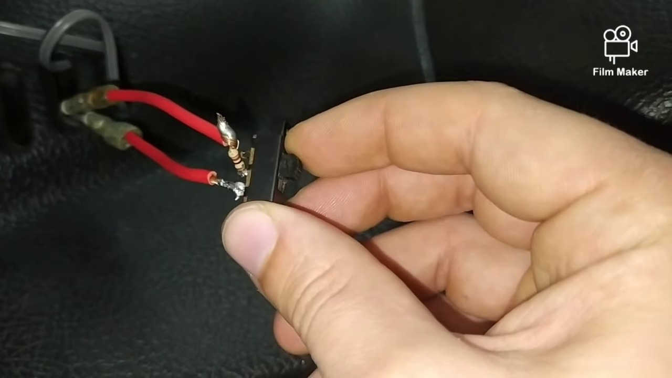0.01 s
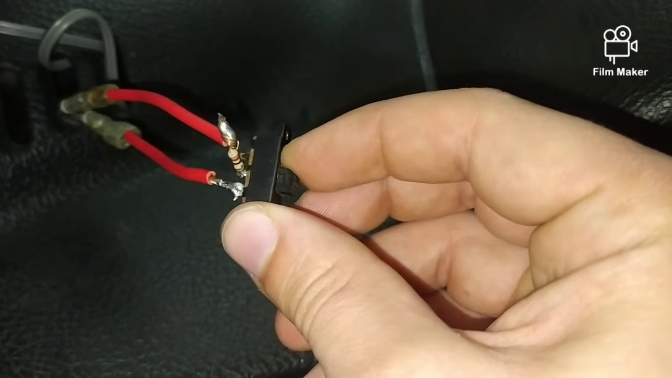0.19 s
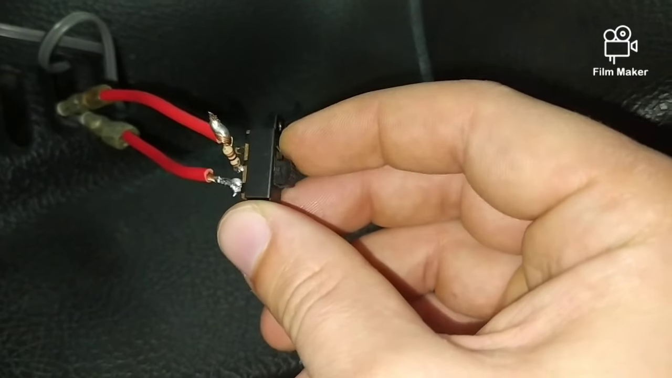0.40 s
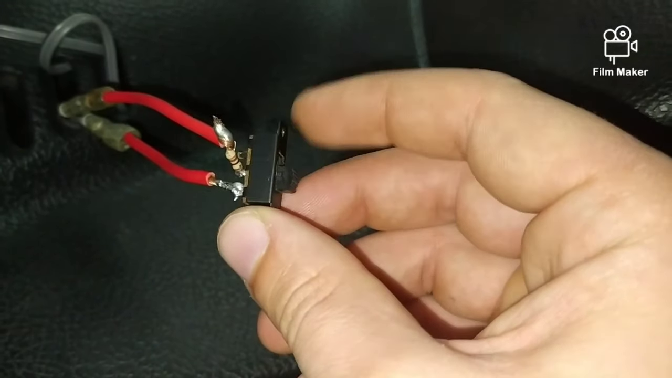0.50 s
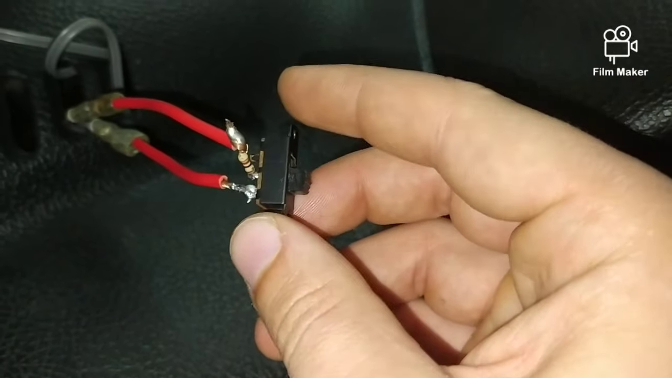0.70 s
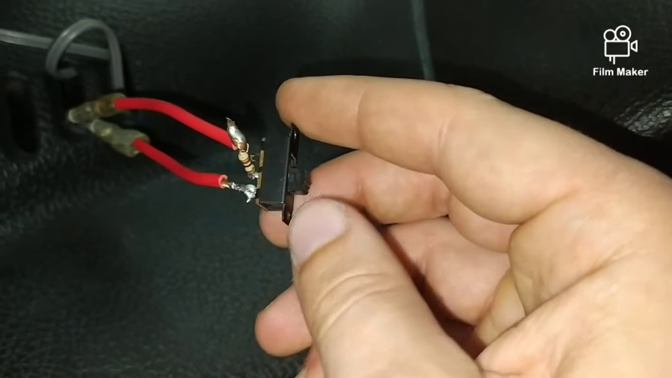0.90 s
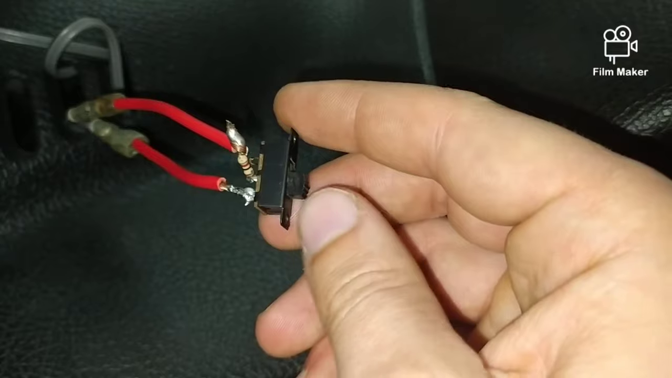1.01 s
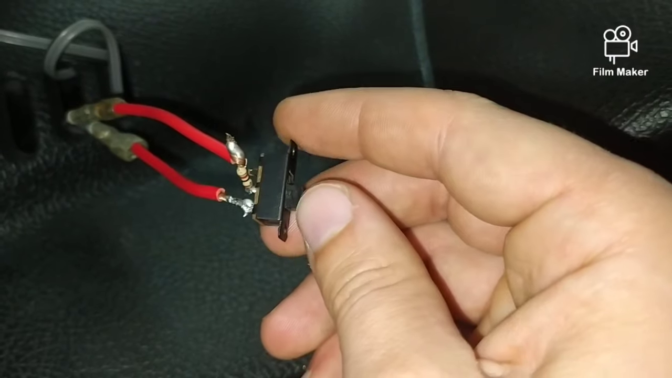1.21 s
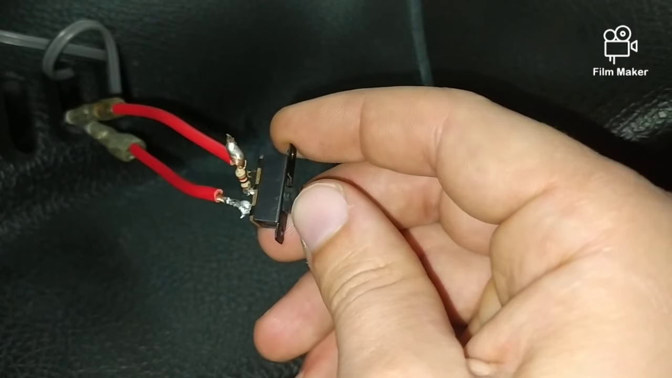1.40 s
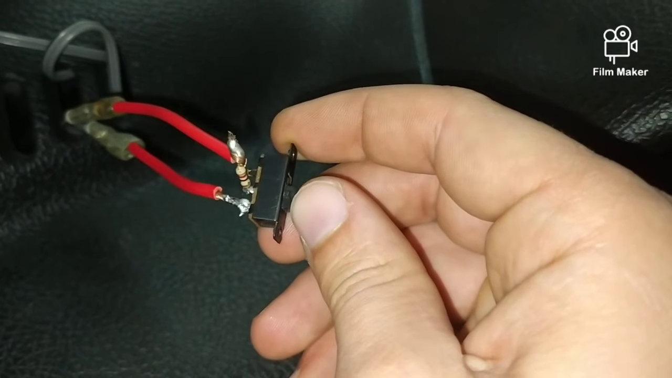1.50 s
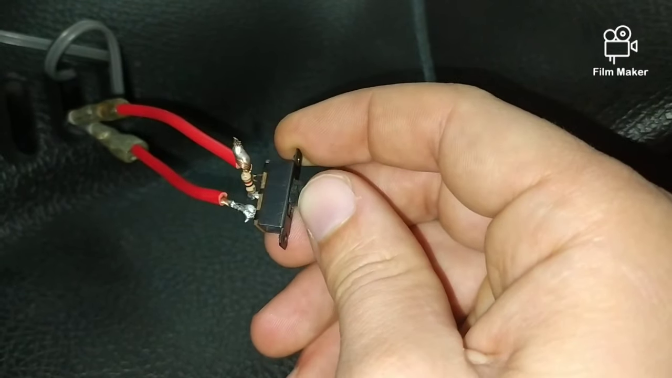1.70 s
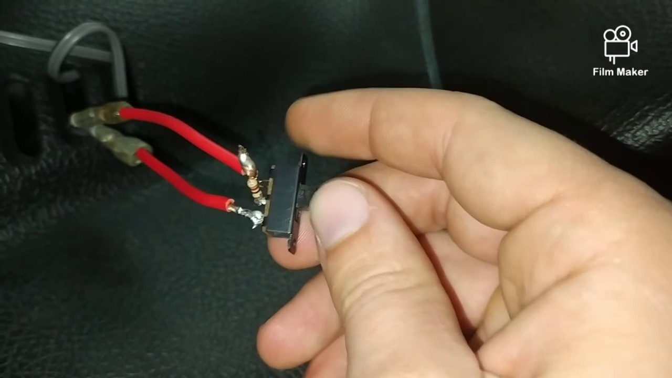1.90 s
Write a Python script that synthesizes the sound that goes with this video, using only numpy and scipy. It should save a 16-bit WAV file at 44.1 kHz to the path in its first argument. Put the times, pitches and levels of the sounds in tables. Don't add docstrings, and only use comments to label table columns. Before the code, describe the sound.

Close, dry clicks of a hand-operated slide switch: first a rattling cluster of contacts, then much later a tighter snap back. Between them only soft hiss, faint fingertip taps and sleeve rustle in a parked cabin.

```python
import sys
import numpy as np
from scipy import signal
from scipy.fft import rfft, irfft
from scipy.io import wavfile

SR = 44100
rng = np.random.default_rng(int(sys.argv[2]) if len(sys.argv) > 2 else 0)


def persist_wave(psi):
    counts = np.round(np.clip(psi, -1, 1) * 32767).astype(np.int16)
    wavfile.write(sys.argv[1], SR, np.atleast_2d(counts).T)


def level_to_linear(level):
    exponent = np.asarray(level, float) / 20
    return 10 ** exponent


N = 88200
T = np.arange(N) / SR

# t/s, level/dB, right port late/ms, left over right/dB, crack level/dB
PUSH_CONTACTS = [
    (.2062, -42, .2, 0, 5),
    (.2081, -15, 0, 6, 1),
    (.2085, -14, .4, 3, 0),
    (.2101, -17, 0, 1, -3),
    (.2128, -23, .2, -5, -6),
    (.2178, -20, .3, -6, -9),
    (.2205, -25, 0, 2, -7),
    (.2225, -29, .3, 0, -6),
]
PULL_CONTACTS = [
    (1.6934, -31, 0, 1, -9),
    (1.6957, -14, -.1, 4, 1),
    (1.6980, -25, -.3, -3, -9),
    (1.7045, -29, 0, -2, -9),
    (1.7085, -28, 3, 4, -16),
]
# f/Hz, level/dB, t60/s
PUSH_MODES = [(5900, -9, .03), (6250, -10, .04), (7740, -9, .04), (8515, -3, .05), (8650, -1, .055),
              (8850, 0, .055), (9030, -3, .05), (9930, -4, .04), (10800, -10, .03), (13440, -18, .035)]
PULL_MODES = [(5600, -13, .025), (7725, -9, .035), (8240, -8, .045), (8440, -7, .05), (8800, 0, .055),
              (9095, 0, .055), (9420, -6, .05), (9560, -3, .045), (9965, -6, .04), (11080, -12, .035)]
# f/Hz, level/dB
PUSH_CRACK = [(290, -55), (1000, -30), (2400, -38), (3900, -28.5), (5930, -8), (6660, -17.5), (8670, -1),
              (14700, -17.5), (16500, -34)]
PULL_CRACK = [(290, -96), (1100, -32), (4170, -26.5), (7820, 0), (9060, -8.5), (10200, 0.5), (12900, -21.5),
              (14700, -18), (16500, -26)]
# f/Hz, level/dB
PUSH_SCATTER = [(880, -64.5), (1500, -33.5), (2220, -24.5), (4170, -28), (6820, -18.5), (8680, -0.5),
                (12500, -21), (16500, -28)]
PULL_SCATTER = [(880, -50), (1500, -18.5), (3780, -32), (5420, -22.5), (9040, 1.5), (10900, -19),
                (15400, -45), (16500, -55)]
# crack, modes, scatter, ringing tail, thump, each level/dB
PUSH_MIX = (0, -8.5, -5.5, -25.5, -24)
PULL_MIX = (-4.5, -8, -7, -27, -35)
# f/Hz, width/Hz, level/dB
TAIL = [(8700, 300, 1), (9100, 450, 0), (9300, 1600, -7), (6200, 1500, -16), (13000, 3000, -28)]
# f/Hz, level/dB, t60/s
THUMP = [(369, 2.5, 0.037), (285.7, -6.5, 0.04), (528, -6.5, 0.042), (753, -6.5, 0.028),
         (1180, -9.5, 0.029), (2323, -10, .04)]
# f/Hz, width/Hz, level/dB
CABIN = [(150.76, 68, -11), (200, 18, -4.5), (222.6, 45, 1.5), (320, 29, -1.5), (462, 30, -1),
         (600, 23, -10), (722, 43, -10.5)]
# t/s, level/dB
LEAN = [
    (1.498, -73),
    (1.536, -78.5),
    (1.556, -61),
    (1.708, -63.5),
    (1.736, -69.5),
    (1.78, -65),
    (1.928, -80.5),
    (1.948, -72.5),
    (2.0, -105),
]
# f/Hz, width/Hz, level/dB
LEATHER = [(833, 9.4, 3.5), (968, 20, 3), (1340, 50, -7.5), (1700, 9.5, 0.5), (2140, 87, -6), (2270, 42, 2)]
# t/s, attack/s, hold/s, t60/s, level/dB
RASP = (1.76, .04, .06, .3, -72)
# t/s, attack/s, hold/s, t60/s
GROAN = (1.595, .04, .075, .12)
# t/s, attack/s, hold/s, t60/s, level/dB
STROKES = [
    (0, 0.006, 0.11, 1, -78.5),
    (0.333, 0.033, 0.059, 0.98, -64.5),
    (1.313, 0.014, 0.06, 0.92, -73),
    (1.644, 0.13, 0.091, 0.54, -68),
    (1.953, 0.012, 0.15, .3, -74.5),
]
# f/Hz, level/dB
CLOTH = [(180, -69.5), (300, 4), (433, 0.5), (565, -11.5), (856, -6.5), (2000, -0.5), (3350, -17),
         (8940, -14), (16000, -52)]
# t/s, f/Hz, width/Hz, level/dB
SQUEAK = (1.965, 2230, 120, -75)
# t/s, level/dB, f/Hz
TAPS = [
    (0.084, -69, 806),
    (0.269, -62.5, 265),
    (.455, -58.5, 200),
    (0.574, -63, 178),
    (0.973, -64, 780),
    (1.233, -68.5, 677),
    (1.399, -64, 770),
    (1.483, -72, 764),
    (1.943, -64, 800),
]
# t/s, attack/s, hold/s, t60/s, level/dB
PHRASES = [
    (.05, .06, 0.11, .2, -92.5),
    (0.224, 0.072, 0.15, 0.18, -81.5),
    (0.71, 0.076, 0.12, 0.22, -86.5),
    (1.173, 0.17, 0.06, 0.46, -84.5),
    (1.618, 0.064, 0.14, 1, -84.5),
]
# f/Hz, level/dB
FLOOR = [(20, 6), (32, -8.5), (558, -23), (1150, -30.5), (4400, -40), (10500, -36), (13000, -33.5),
         (16000, -43)]
# f/Hz, likeness (0 to 1)
ALIKE = [(30, 0.11), (250, 0.29), (1000, 0.033), (10000, 0.058)]

PUSH_CRACK_PAN_DB, PULL_CRACK_PAN_DB = -1, -7
CRACK_T60_S, CRACK_RISE_S = .0035, .00015
SPRING_T60_S, SCATTER_T60_S, TAIL_T60_S = .05, .033, .6
THUMP_RISE_S, THUMP_LATE_S = .006, .004
SLIP_HZ, SLIP_SCATTER_DB = 71.9, -1
GROAN_HZ, GROAN_DB = 317.7, -59.5
CLOTH_FLICKER_DB, CLOTH_ALIKE = 1.2, .3
TAP_T60_S, TAP_RISE_S = .05, .003
CRICKET_HZ, CRICKET_WIDTH_HZ = (4557, 4464), (40, 90)
TRILL_HZ, TRILL_DEPTH, CHORUS_DB = 59.4, .3, -93
FLOOR_DB, DRIFT_DB = -70.5, -64.5
STREET_HZ, STREET_DB = 2180, -83
HUM_HZ, HUM_DB = 200, -80
PORT_HZ, PORT_DB = 9500, -83
SHELF_HZ, SHELF_DB, TOP_HZ = 10850, -3.5, 16150
PATCHY_DB, PATCH_HZ = 4.5, 450
PORTS_DB = -1.3


def unit(x):
    return x / np.sqrt(np.mean(x ** 2))


def energy(x):
    return x / np.sqrt(np.sum(x ** 2, axis=1, keepdims=True))


def curve(table, hz):
    table = np.array(table)
    return np.interp(np.log(hz + 1), np.log(table[:, 0]), table[:, 1])


def colour(x, table):
    cepstrum = irfft(curve(table, np.fft.rfftfreq(4096, 1 / SR)) * np.log(10) / 20)
    cepstrum[1:2048] *= 2
    cepstrum[2049:] = 0
    response = irfft(np.exp(rfft(cepstrum)))
    return signal.fftconvolve(x, response[None], axes=-1)[..., :x.shape[-1]]


def band(x, hz, width):
    return signal.lfilter(*signal.iirpeak(hz, hz / max(width, 1), fs=SR), x)


def pair(alike):
    mid, side = rng.standard_normal((2, N))
    alike = np.clip(alike, 0, 1)
    opposed = side * np.array([[1], [-1]])
    return (np.sqrt(1 + alike) * mid + np.sqrt(1 - alike) * opposed) / np.sqrt(2)


def walk(rate):
    lowpass = signal.butter(2, rate, fs=SR, output="sos")
    return unit(signal.sosfilt(lowpass, rng.standard_normal(N)))


def swell(at, attack, hold, t60, db):
    released = np.clip(T - at - attack - hold, 0, None)
    return level_to_linear(db - 60 * released / t60) * np.clip((T - at) / attack, 0, 1)


def fade(t60):
    return level_to_linear(-60 * T[:SR // 2] / t60)


def rise(time):
    return 1 - np.exp(-T[:SR // 2] / time)


def ring(modes):
    phases = 2 * np.pi * rng.random((len(modes), 2, 1))
    out = 0
    for (hz, db, t60), phase in zip(modes, phases):
        out = out + level_to_linear(db) * fade(min(t60, SPRING_T60_S)) * np.sin(2 * np.pi * hz * T[:SR // 2] + phase)
    return out


def ringing_tail():
    tail = 0
    for hz, width, db in TAIL:
        noise = rng.standard_normal((2, SR // 2))
        tail = tail + level_to_linear(db) * band(band(noise, hz, 2 * width), hz, 2 * width)
    return tail * fade(TAIL_T60_S)


def snap(contacts, modes, crack, scatter, mix_db, crack_pan_db):
    out, size = np.zeros((2, N)), SR // 2
    tail = ringing_tail()
    thump = ring(THUMP)[[0, 0]] * rise(THUMP_RISE_S)
    spring = ring(modes)
    crack_db, spring_db, scatter_db, tail_db, thump_db = mix_db

    hardest = max(contacts, key=lambda row: row[1])
    blow = int(hardest[0] * SR + THUMP_LATE_S * SR)
    out[:, blow:blow + size] += (level_to_linear(thump_db) * energy(thump))[:, :N - blow]

    facing = level_to_linear(crack_pan_db * np.array([[.5], [-.5]]))
    noise = rng.standard_normal((len(contacts), 2, 2, size))
    for (at, db, late_ms, pan_db, contact_crack_db), n in zip(contacts, noise):
        click = colour(n[0] * fade(CRACK_T60_S) * rise(CRACK_RISE_S), crack)
        reflections = colour(n[1] * fade(SCATTER_T60_S), scatter)
        sound = level_to_linear(crack_db + contact_crack_db) * facing * energy(click)
        sound = sound + level_to_linear(spring_db) * energy(spring)
        sound = sound + level_to_linear(scatter_db) * energy(reflections)
        sound = 4 * (sound + level_to_linear(tail_db) * energy(tail))
        for port, side in enumerate((1, -1)):
            i = int((at + port * late_ms / 1000) * SR)
            out[port, i:i + size] += (level_to_linear(db + side * pan_db / 2) * sound[port])[:N - i]
    return out


def seat():
    chance = rng.random((N, 2))
    slips = (chance[:, 0] < SLIP_HZ / SR) * level_to_linear(SLIP_SCATTER_DB * 2 * chance[:, 1])
    slips = slips + 0.2 * pair(0.6)
    creak = 0
    for hz, width, db in CABIN:
        creak = creak + level_to_linear(db) * unit(band(band(slips, hz, 3 * width), hz, width))
    times, effort_db = np.array(LEAN).T
    lean = level_to_linear(np.interp(T, times, effort_db, left=-120))

    hide = 0
    for hz, width, db in LEATHER:
        hide = hide + level_to_linear(db + 5.9 * walk(7.0)) * unit(band(pair(0.34), hz, width))

    groan_phase = 2 * np.pi * np.cumsum(GROAN_HZ * (1 + 0.01 * walk(17))) / SR
    groan = np.sin(groan_phase) * level_to_linear(0.63 * walk(30))
    return unit(creak) * lean + groan * swell(*GROAN, GROAN_DB) + unit(hide) * swell(*RASP)


def sleeves():
    cloth = unit(colour(pair(CLOTH_ALIKE), CLOTH)) * level_to_linear(CLOTH_FLICKER_DB * walk(23))
    at, hz, width, db = SQUEAK
    squeak = unit(band(pair(0.7), hz, width)) * swell(at, 0.0044, 0.12, 0.18, db)
    return cloth * sum(swell(*stroke) for stroke in STROKES) + squeak


def taps():
    out, size = np.zeros((2, N)), SR // 20
    envelope = (fade(TAP_T60_S) * rise(TAP_RISE_S))[:size]
    for (at, db, hz), n in zip(TAPS, rng.standard_normal((len(TAPS), 2, size))):
        n = (n + n[0]) * envelope
        body = unit(band(n, hz, 0.25 * hz)) / 4
        touch = hz / 2000 * band(band(n, 1500, 1600), 1500, 1600)
        i = int(at * SR)
        out[:, i:i + size] += level_to_linear(db) * (body + touch)
    return out


def crickets():
    trill_phase = 2 * np.pi * np.cumsum(TRILL_HZ * (1 + 0.32 * walk(3.9))) / SR
    trill = .5 + .5 * np.sin(trill_phase)
    song = 0
    for hz, width in zip(CRICKET_HZ, CRICKET_WIDTH_HZ):
        song = song + unit(band(band(pair(0.21), hz, width), hz, 2 * width))
    phrases = level_to_linear(CHORUS_DB) + sum(swell(*phrase) for phrase in PHRASES)
    return song * (1 + TRILL_DEPTH * (trill - .5)) * phrases


def floor():
    hiss, gust = 0, walk(1.3)
    for hz in 22 * 2 ** np.arange(0, 9.6, .5):
        db = curve(FLOOR, hz) + 10 * np.log10(hz) + 0.1 * gust + 1.7 * walk(3.9)
        edges = signal.butter(2, [hz / 2 ** .25, hz * 2 ** .25], "band", fs=SR, output="sos")
        hiss = hiss + level_to_linear(db) * unit(signal.sosfilt(edges, pair(curve(ALIKE, hz))))
    air = level_to_linear(FLOOR_DB + 2.0) * unit(hiss)
    air = air + level_to_linear(STREET_DB) * unit(band(pair(0.077), STREET_HZ, 600.0))
    air = air + level_to_linear(HUM_DB) * unit(band(pair(0.27), HUM_HZ, 11))
    air = air + level_to_linear(PORT_DB) * unit(band(pair(0.17), PORT_HZ, 2436))
    air = air + level_to_linear(DRIFT_DB) * np.array([walk(7.6), walk(2.4)])

    lowpass = signal.ellip(6, .2, 50, SHELF_HZ, fs=SR, output="sos")
    below = signal.sosfiltfilt(lowpass, air)
    patches = 0
    for hz in np.arange(SHELF_HZ, TOP_HZ, PATCH_HZ):
        patch = band(band(air - below, hz, PATCH_HZ), hz, PATCH_HZ)
        patches = patches + level_to_linear(SHELF_DB + PATCHY_DB * walk(14)) * patch
    return below + patches


def scene():
    push = snap(PUSH_CONTACTS, PUSH_MODES, PUSH_CRACK, PUSH_SCATTER, PUSH_MIX, PUSH_CRACK_PAN_DB)
    pull = snap(PULL_CONTACTS, PULL_MODES, PULL_CRACK, PULL_SCATTER, PULL_MIX, PULL_CRACK_PAN_DB)
    return push + pull + seat() + sleeves() + taps() + crickets() + floor()


def top_cut(x):
    return signal.sosfilt(signal.butter(12, 16840, fs=SR, output="sos"), x)


def record(dry):
    lowpass = signal.ellip(8, .2, 60, TOP_HZ, fs=SR, output="sos")
    port_gain = level_to_linear(PORTS_DB * np.array([[.5], [-.5]]))
    return top_cut(signal.sosfilt(lowpass, dry) * port_gain)


dry = scene()
out = record(dry)
persist_wave(out)
```